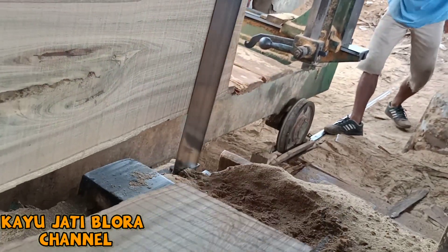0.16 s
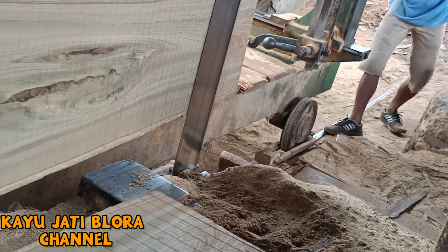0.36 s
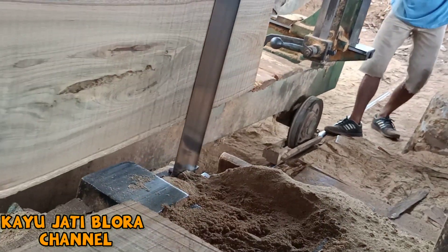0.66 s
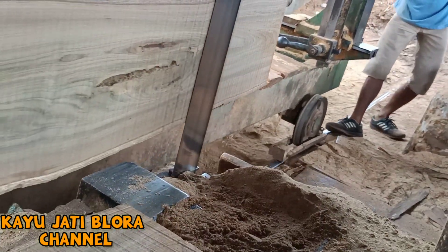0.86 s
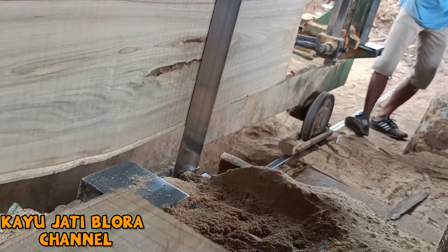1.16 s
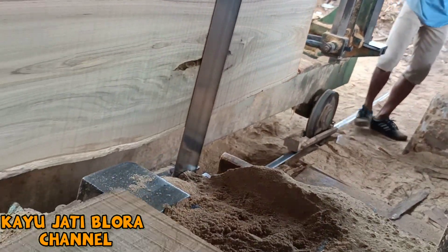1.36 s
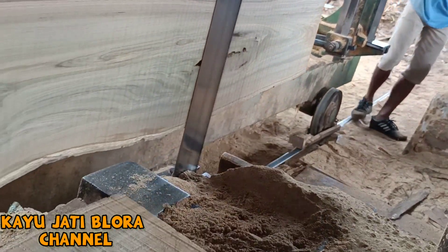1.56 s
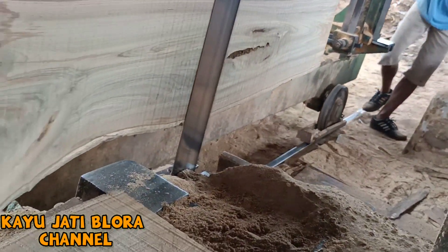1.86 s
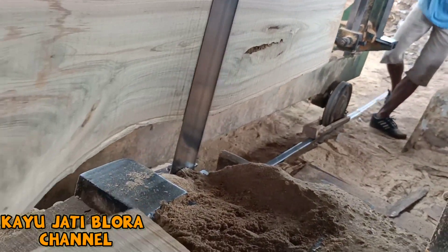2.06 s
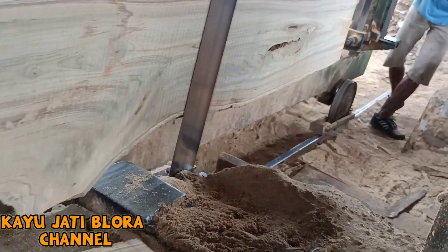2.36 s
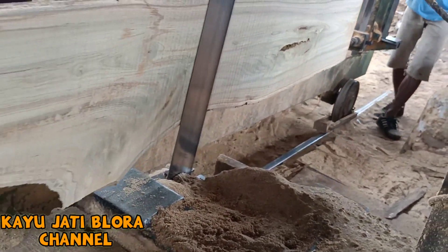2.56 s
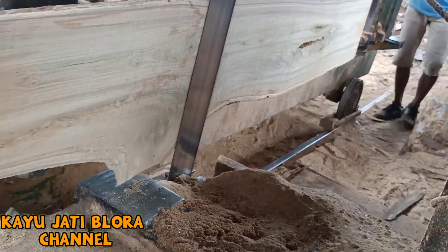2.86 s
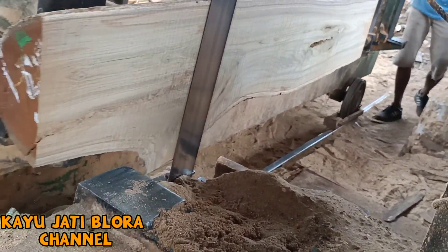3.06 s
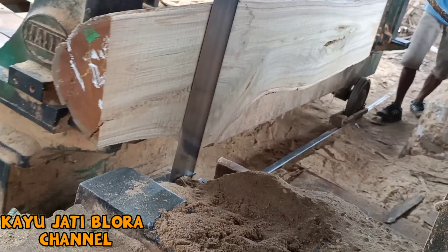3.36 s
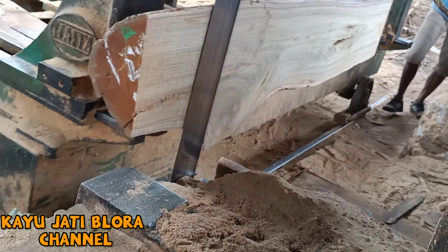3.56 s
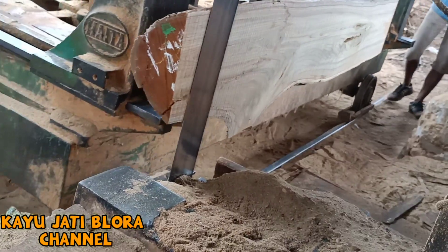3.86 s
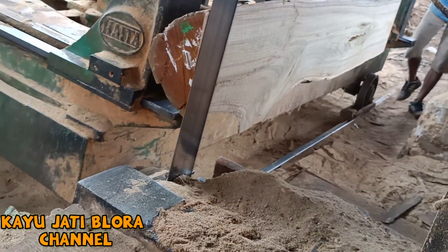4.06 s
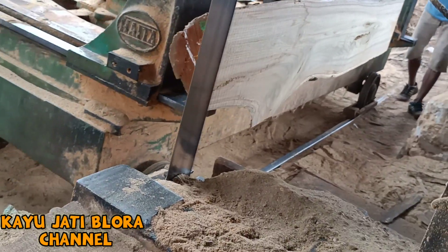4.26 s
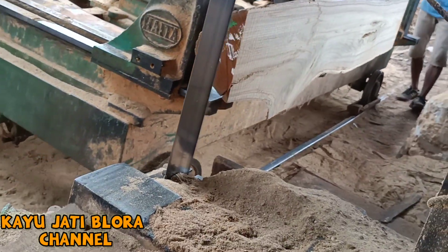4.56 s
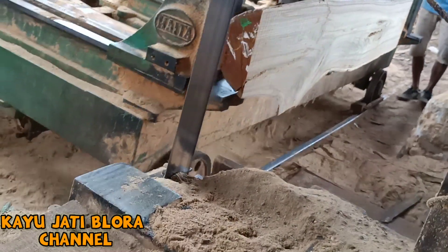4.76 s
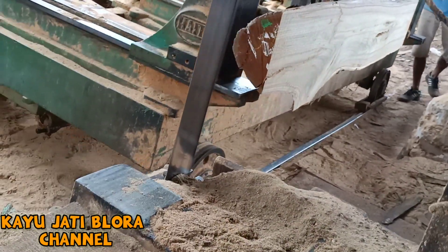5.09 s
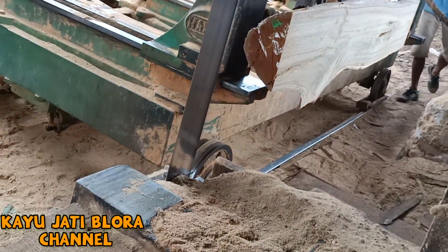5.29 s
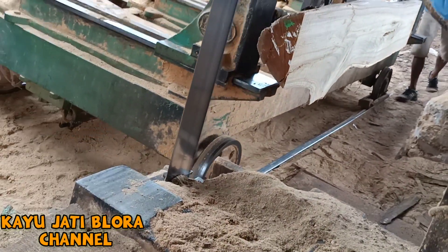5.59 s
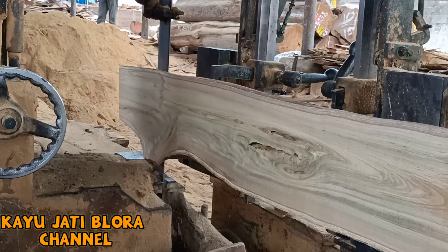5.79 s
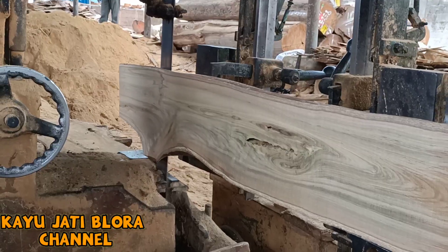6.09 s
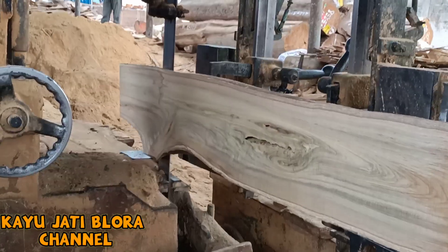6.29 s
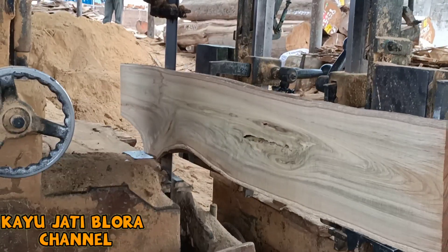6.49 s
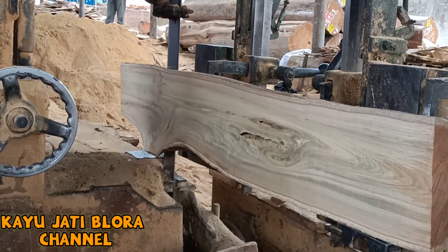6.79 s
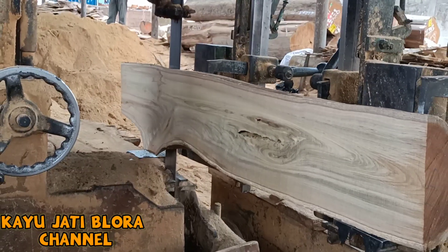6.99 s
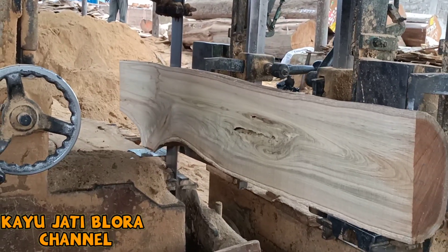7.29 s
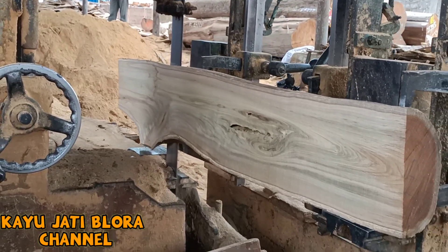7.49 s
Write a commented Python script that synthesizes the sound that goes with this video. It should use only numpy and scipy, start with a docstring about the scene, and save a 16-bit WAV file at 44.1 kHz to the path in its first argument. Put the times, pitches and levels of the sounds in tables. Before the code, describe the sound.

A band saw rips through a thick log with a loud bright rasping hiss and whistle, then the view shifts and wind buffets one side.

```python
"""A band saw rips a log lengthwise, heard close up through two small microphone ports.
From the start teeth rasp and whistle in the kerf, chips hiss, narrow rings swell, and frame and iron drone.
Wood soon pinches the blade in bursts of rubbing; low knocks and faint bursts of low noise come and go.
The whistle rises from about 4.65 s; at 5.64 s the listening place moves to the other side of the saw,
where a motor whines and a draught buffets the right port. Shaped noise, tooth pulses and sines make it all."""
import sys
import numpy as np
from scipy import signal
from scipy.fft import rfft, irfft, next_fast_len
from scipy.io import wavfile
from scipy.ndimage import uniform_filter1d, map_coordinates

SR = 44100
rng = np.random.default_rng(int(sys.argv[2]) if len(sys.argv) > 2 else 0)


def to_wav(s):
    """Save 16-bit WAV."""
    ch = np.atleast_2d(s).T  # columns
    pcm = np.round(np.clip(ch, -1, 1) * 32767)  # PCM
    wavfile.write(sys.argv[1], SR, pcm.astype(np.int16))


N = 336924
T = np.arange(N) / SR  # time in s
MOVE_S = 5.64  # when the listening place moves


def amp(db):
    """Level law: 20 dB is a factor of ten in amplitude."""
    return 10 ** (np.asarray(db) / 20)


def unit(x):
    """Normalisation to a root-mean-square of 1."""
    return x / np.sqrt(np.mean(x ** 2) + 1e-20)


def along(points, hz):
    """Interpolation of (f, value) points on a logarithmic frequency axis."""
    f, values = np.transpose(points)
    return np.interp(np.log(hz + 1), np.log(f + 1), values)


def curves(rows):
    """Linear interpolation in time: one curve for each column after the time."""
    times, *columns = np.transpose(rows)
    return [np.interp(T, times, column) for column in columns]


def wobble(rate):
    """Band-limited random modulation: a smooth curve through `rate` random knots a second, at rms 1."""
    knots = rng.standard_normal(16384)
    coarse = T[::8]
    smooth = map_coordinates(knots, [coarse * rate], mode="wrap")
    return unit(np.interp(T, coarse, smooth))


def filtered(x, response):
    """Linear filtering: the spectrum is multiplied by a response of frequency."""
    m = next_fast_len(N + 8192)
    hz = np.fft.rfftfreq(m, 1 / SR)
    return irfft(rfft(x, m) * response(hz), m)[..., :N]


def coloured(x, spectrum):
    """Spectral shaping: x is weighted by (f, dB) points and brought to rms 1."""
    return unit(filtered(x, lambda hz: amp(along(spectrum, hz))))


def white():
    """White noise: equal power at all frequencies, uncorrelated between the ports."""
    return rng.standard_normal((2, N))


def patchy(x, depth_db, size):
    """Random spectro-temporal modulation: gains drift in patches of size (bins, frames)."""
    z = signal.stft(x, nperseg=2048)[2]
    field = rng.standard_normal(z.shape)
    for axis in (1, 2, 1, 2):
        field = uniform_filter1d(field, size[axis - 1], axis)
    return signal.istft(z * amp(depth_db * unit(field)), nperseg=2048)[1][:, :N]


def swells(rows):
    """Gaussian envelopes: each (centre, reach, dB) bell falls by e squared at its reach."""
    total = 0
    for centre, reach, db in rows:
        total = total + amp(db) * np.exp(-2 * np.minimum(((T - centre) / reach) ** 2, 20))
    return total


def held(start, length, attack_s, release_s, sag_db_per_s):
    """Attack, exponential decay and release: an envelope rises, sags while it holds, and lets go."""
    age = T - start
    attack = np.clip(age / attack_s, 0, 1)
    release = np.clip((length - age) / release_s + .5, 0, 1)
    return attack * release * amp(-sag_db_per_s * np.clip(age, 0, None))


def behind():
    """Crossfade of listening place: 0 at the first, 1 at the second, within 10 ms."""
    return np.clip((T - MOVE_S) * 100 + .5, 0, 1)


# Coherence of the sound field at the two ports: f/Hz, left-right likeness [0 to 1]
PORT_LIKENESS = [(40, 0.51), (130, 0.98), (640, 0.75), (1000, 0.71), (1500, 0), (3000, 0.14)]


def port_angle(hz):
    """Correlation as an angle: half the arccosine of the left-right likeness."""
    return np.arccos(np.clip(along(PORT_LIKENESS, hz), -1, 1)) / 2


def spread(pair):
    """Spatial coherence: long waves reach both ports alike, short ones do not."""
    split = lambda hz: np.array([np.cos(port_angle(hz)), np.sin(port_angle(hz))])
    mid, side = filtered(pair, split)
    return np.array([mid + side, mid - side])


def from_right(x, lag_s):
    """Interaural-type delay: sound from the right reaches the left port a little later."""
    return filtered(x, lambda hz: np.exp(1j * np.pi * hz * lag_s * np.array([[-1], [1]])))


def tones(rows, steady):
    """Narrow-band lines: a steady phasor plus one that fades and wavers, from (f, width, dB) rows."""
    out = np.zeros((2, N))
    for hz, width, db in rows:
        wavering = wobble(1.5 * width) + 1j * wobble(1.5 * width)
        swell = np.sqrt(steady) + np.sqrt((1 - steady) / 2) * wavering
        apart = port_angle(hz)
        port_phases = np.exp([[1j * apart], [-1j * apart]])
        line = swell * np.exp(2j * np.pi * hz * T)
        out += amp(db) * np.sqrt(2) * np.real(port_phases * line)
    return out


# How hard the log is fed into the teeth: t/s, load/dB
FEED_LOAD = [(0, 1), (1.5, 1.3), (2.1, -1.5), (2.7, -0.5), (3, -2), (3.48, -2), (3.6, .5), (4.45, 1.45),
             (4.9, 0.1), (5.3, 0.4), (7.64, -1)]


def load():
    """Feed force as a driving level, in dB."""
    return curves(FEED_LOAD)[0]


def level(first_db, second_db, per_load):
    """Source level in dB: set by the listening place, raised in proportion to the load."""
    return first_db + (second_db - first_db) * behind() + per_load * load()


# Tooth strikes on steel, spectral shape: f/Hz, relative level/dB
STRIKE_SPECTRUM = [(2000, 0.5), (9000, -4), (9950, 3), (10400, 5), (10850, 3.5), (11400, 8), (13000, -4),
                   (14500, -8), (16000, -1)]


def teeth(flutter):
    """Periodic excitation: one pulse per tooth; speed flutters and scattered paths smear each pulse."""
    tooth_hz = 452.2
    speed = 1 + flutter * wobble(70) + .0012 * wobble(3)
    turns = np.cumsum(tooth_hz * speed) / SR
    offset = (turns % 1 - .5) * SR / tooth_hz  # samples from the nearest strike
    paths = rng.standard_normal((2, 40))  # one random phase per port and tooth harmonic

    def scatter(hz):
        """Dispersion: each harmonic takes its own phase."""
        harmonic = np.minimum(np.rint(hz / tooth_hz).astype(int), paths.shape[1] - 1)
        return np.exp(2j * np.pi * paths[:, harmonic])

    return coloured(unit(filtered(np.sinc(offset), scatter)), STRIKE_SPECTRUM)


def bite(pulses, share):
    """Power-preserving mixture: regular tooth strikes with the noise of tearing fibres."""
    return np.sqrt(share) * pulses + np.sqrt(1 - share) * white()


def modes(rows):
    """Modal resonance: narrow (f, width, dB) bands kept ringing by noise as random blows."""
    def bells(hz):
        """Superposed modal power, as an amplitude response."""
        power = sum(amp(2 * db) / width * np.exp(-((hz - centre) / width * 2) ** 2)
                    for centre, width, db in rows)
        return np.sqrt(power)

    total = np.sqrt(sum(amp(2 * db) for _, _, db in rows))
    return total * unit(filtered(white(), bells))


# Rasp of the teeth in the wood: level/dB at first place, level/dB at second, dB per dB of load
RASP_LEVELS = (-22.6, -25.5, 0.98)
# Rasp spectral density: f/Hz, relative level/dB per Hz
RASP_SPECTRUM = [(1000, -34), (1600, -27.5), (2050, -3), (2500, 1), (3300, 1.5), (3780, -2.5), (4300, 1),
                 (5500, -4), (7500, -8.5), (9500, -10.5), (16000, -47)]
# Bending modes of the blade: f/Hz, width/Hz, level/dB relative to the rasp at the first place
BENDING_MODES = [(2315, 34, -22), (2890, 40, -22), (2948, 60, -16), (3168, 28, -15), (3284, 130, -16.5)]


def rasp(pulses, grain):
    """Forced vibration: tearing fibres excite a broad band and the blade's bending modes."""
    tearing = patchy(bite(pulses, share=.02), depth_db=2.3, size=(4, 6))
    # the modes all but vanish at the second place
    ringing = amp(-42 * behind()) * patchy(modes(BENDING_MODES), depth_db=2, size=(3, 8))
    rasp_db = level(*RASP_LEVELS) + 0.36 * grain + 0.79 * wobble(40)
    return amp(rasp_db) * (coloured(tearing, RASP_SPECTRUM) + ringing)


# Kerf whistle before damping: level/dB at first place, level/dB at second, dB per dB of load
WHISTLE_LEVELS = (-24.5, -25.5, 0.52)
# It rises as the blade nears the end of the log: t/s, f/Hz, emphasis/dB
KERF_PATH = [(0, 5158, 1), (4.65, 5215, -1.6), (5.08, 6800, 1.5), (5.55, 6780, 1.8), (5.75, 6680, -2),
             (7, 6540, 3), (7.64, 6540, -1.5)]


def kerf_whistle(grain, pinch):
    """Moving resonance: low-pass noise modulates a gliding carrier; rubbing damps it."""
    centre_hz, emphasis_db = curves(KERF_PATH)
    width_hz = 930
    phase = 2 * np.pi * np.cumsum(centre_hz) / SR
    slow = lambda: filtered(white(), lambda hz: 1 / (1 + (hz / width_hz) ** 2))
    band = unit(slow() * np.cos(phase) + slow() * np.sin(phase))
    whistle_db = level(*WHISTLE_LEVELS) + emphasis_db + 0.15 * grain + 0.6 * wobble(30)
    pinch_damping = 1.4  # how strongly the rubbing smothers the whistle
    return amp(whistle_db) * patchy(band, depth_db=2.5, size=(4, 4)) / (1 + pinch_damping * pinch)


# Hiss of the chips: level/dB at first place, level/dB at second, dB per dB of load
CHIP_LEVELS = (-26, -25.5, .3)
# Chip spectral density: f/Hz, relative level/dB per Hz
CHIP_SPECTRUM = [(5000, -16), (7500, -4.5), (8500, 2.5), (10500, 4), (12000, -1), (13300, 0.5),
                 (16000, -31)]


def chips(pulses, regular, modulation_db):
    """Granular noise: chips hiss out of the kerf in uneven spurts."""
    spray = patchy(bite(pulses, regular), depth_db=2.0, size=(5, 3))
    return amp(level(*CHIP_LEVELS) + modulation_db) * coloured(spray, CHIP_SPECTRUM)


# Rubbing between pinches: level/dB at first place, level/dB at second, dB per dB of load
RUB_LEVELS = (-34, -22, 0.1)
# Rub spectral density: f/Hz, relative level/dB per Hz
RUB_SPECTRUM = [(7000, -57), (10500, -4), (12500, -2), (13500, -4), (14500, 7), (16000, -5)]


def rub(pulses, regular, pinch, modulation_db):
    """Sliding friction: the wood's pressure on the blade's side sets the level of a pulsing fizz."""
    pressure = np.hypot(amp(level(*RUB_LEVELS)), pinch)
    sliding = patchy(bite(pulses, 0.92 * regular), depth_db=3.5, size=(5, 3))
    return pressure * amp(modulation_db) * coloured(sliding, RUB_SPECTRUM)


# Narrow, unsteady rings that swell and fade, 2 to 3.6 kHz: centre t/s, reach/s, f/Hz, level/dB
UNSTEADY_RINGS = [(.02, 0.23, 3420, -28), (.3, 1, 2087, -32), (.37, 0.22, 3166, -26),
                  (.83, .22, 3170, -27.5), (1.25, .4, 2254, -35), (1.55, .28, 3060, -32),
                  (3.948, .4, 2245, -32.5), (5.298, .4, 3630, -30.5)]


def unsteady_rings():
    """Narrow-band noise: wavering lines swell and fade under Gaussian envelopes."""
    total = np.zeros((2, N))
    for s, reach, hz, db in UNSTEADY_RINGS:
        total += swells([(s, reach, db)]) * tones([(hz, 170, 0)], steady=0)
    return total


# The kerf closes and pinches the blade: start t/s, length/s, rub level/dB, extra chips/dB, extra chatter/dB
KERF_PINCHES = [(0.697, 0.18, -29, 2, -2), (1.63, 0.74, -25.5, 2.5, 1.8), (2.687, 0.074, -20, 5, 0),
                (2.812, 0.63, -26.5, 4, 0.5), (4.353, 0.16, -40, 3, -1), (5.04, 0.65, -28, 1.5, -2),
                (7.27, 0.27, -23, -3, 0)]


def pinching():
    """Normal force in friction: each grip adds rub amplitude, dB of chips and dB of chatter."""
    grips = np.array([held(s, length, attack_s=0.017, release_s=0.057, sag_db_per_s=4)
                      for s, length, *_ in KERF_PINCHES])
    _, _, rub_db, chips_db, chatter_db = np.transpose(KERF_PINCHES)
    return np.array([amp(rub_db), chips_db, chatter_db]) @ grips


def blade():
    """Common excitation: the same teeth, grain and pinches drive the blade's rasp, whistle, chips and rub."""
    pinch, extra_chips_db, pinch_chatter_db = pinching()
    pulses = teeth(flutter=.0026)
    regular = .02 + .08 * behind()  # share of regular tooth strikes
    grain = wobble(26)  # hard and soft streaks in the wood
    spurts_db = 0.67 * wobble(70) + 0.12 * wobble(7)  # dust leaves the kerf unevenly
    sway = np.sin(2 * np.pi * np.cumsum(15.0 + 1.06 * wobble(6.2)) / SR)  # about 15 Hz
    chatter = (.4 + pinch_chatter_db) * sway
    chip_modulation_db = extra_chips_db + .5 * grain + spurts_db + .25 * chatter
    rub_modulation_db = 0.44 * grain + 0.84 * spurts_db + chatter
    cutting = rasp(pulses, grain) + kerf_whistle(grain, pinch)
    spray = chips(pulses, regular, chip_modulation_db)
    rubbing = rub(pulses, regular, pinch, rub_modulation_db)
    return cutting + spray + rubbing + unsteady_rings()


# Rumble before throbbing: level/dB at first place, level/dB at second, dB per dB of load
RUMBLE_LEVELS = (-38.5, -41.5, .9)
# Rumble spectral density: f/Hz, relative level/dB per Hz
RUMBLE_SPECTRUM = [(20, -20), (60, -13.5), (130, -11), (215, -1), (275, -9.5), (350, 0), (450, 2),
                   (620, -1), (690, -8), (1000, -14), (3000, -62)]


def rumble():
    """Amplitude modulation: the turning wheels make low noise throb."""
    wheel = np.sin(2 * np.pi * np.cumsum(10.55 + .1 * wobble(2)) / SR)  # about 10.55 Hz
    return amp(level(*RUMBLE_LEVELS) + 2.4 * wheel) * coloured(white(), RUMBLE_SPECTRUM)


# Noise of the frame: level/dB at first place, level/dB at second, dB per dB of load
FRAME_LEVELS = (-33.5, -39.5, 1.4)
# Frame spectral density: f/Hz, relative level/dB per Hz
FRAME_SPECTRUM = [(400, -45), (690, -6.5), (760, 1.5), (1100, -0.5), (1350, -2), (1750, -1.5),
                  (2300, -10.5), (5000, -43)]


def frame_noise():
    """Structure-borne sound: patchy noise of the frame grows with load."""
    noise = patchy(white(), depth_db=2.0, size=(2, 12))
    return amp(level(*FRAME_LEVELS) + 0.82 * wobble(14)) * coloured(noise, FRAME_SPECTRUM)


# Frame rings at the first place: f/Hz, width/Hz, level/dB at 0 dB load
FRAME_RINGS = [(1155, 14, -41.5), (1210, 9.4, -49.5), (1531, 14, -47)]
# Two drones near the tooth rate: f/Hz, width/Hz, level/dB at 0 dB load
BEATING_DRONES = [(456, 4, -45.5), (466, 4, -45.5)]
# Steady whine of the drive at the first place: f/Hz, width/Hz, level/dB
DRIVE_WHINE = [(104.5, 2, -59.5), (588, 2, -47)]
# Drones at the second place: f/Hz, width/Hz, level/dB
DRONES_BEHIND = [(454, 4, -47), (870, 16, -53), (1275, 7.5, -62), (1560, 8, -64), (1843, 4.6, -53.5)]


def drone():
    """Resonance and beats: frame lines grow with load, and two close drones interfere."""
    rings = amp(load()) * tones(FRAME_RINGS, steady=0.2)
    beating = amp(2 * load()) * tones(BEATING_DRONES, steady=0.35)  # 2 dB per dB of load
    front = rings + beating + tones(DRIVE_WHINE, steady=0.69)
    return (1 - behind()) * front + behind() * tones(DRONES_BEHIND, steady=0.75)


# Swells of the drive's hum: centre t/s, reach/s, level/dB
DRIVE_HUM_SWELLS = [(.5, .8, -46), (1.35, 0.39, -37.5), (3, 0.38, -41), (3.62, 0.47, -39.5), (4.8, .9, -45)]


def drive_hum():
    """Narrow-band modulation: an 807 Hz hum swells above its floor of -56 dB."""
    return (amp(-56) + swells(DRIVE_HUM_SWELLS)) * tones([(807, 14, 0)], steady=0.55)


def machine():
    """Superposition: the broad noise is spread between the ports and the lines are added."""
    return spread(rumble() + frame_noise()) + drone() + drive_hum()


# Swells of low rolling noise: centre t/s, reach/s, level/dB before roughness
ROLLING_SWELLS = [(1.25, .45, -46), (2.15, 0.28, -55), (2.8, 0.42, -51), (3.9, 0.57, -50),
                  (5.1, 0.9, -46.5)]
# Rolling spectral density: f/Hz, relative level/dB per Hz
ROLLING_SPECTRUM = [(20, -6), (50, -10), (110, -3), (170, -3.5), (280, -10), (700, -40)]
# Short low knocks and longer low noise swells: centre t/s, reach/s, level/dB
LOW_KNOCKS = [(1.173, 0.0029, -19), (1.197, 0.022, -31), (1.4, 0.22, -41), (2.78, 0.24, -40.5),
              (4.43, 0.11, -31.5)]
# Knock spectral density: f/Hz, relative level/dB per Hz
KNOCK_SPECTRUM = [(30, -17), (130, -3), (400, 4), (600, 4.5), (1200, -26), (4000, -55)]
# Rings of the iron carriage: f/Hz, width/Hz, level/dB once near
IRON_RINGS = [(161, 5, -49.5), (355, 3, -46.5), (523.6, 2.6, -46), (757, 12, -45), (904, 10, -45),
              (947, 8.7, -45.5), (1017, 6, -41), (1033, 5, -47.5)]


def carriage():
    """Enveloped noise and resonance: low rolling and knocks; iron rings louder as its head draws near."""
    floor_db = -60  # rolling between swells
    rolling = (amp(floor_db) + swells(ROLLING_SWELLS)) * amp(1.4 * wobble(22))
    rolling = rolling * coloured(white(), ROLLING_SPECTRUM)
    knocks = swells(LOW_KNOCKS) * coloured(white(), KNOCK_SPECTRUM)
    near_s, approach_s, far_db = 3.62, .5, -8.5  # middle and length of the approach, gain before it
    far = np.clip((near_s - T) / approach_s + .5, 0, 1)
    iron = (1 - behind()) * amp(far_db * far) * tones(IRON_RINGS, steady=0.23)
    return spread(rolling + knocks) + iron


# Bursts of low noise on the right, two faint early, then strong gusts:
# start t/s, length/s, low push level/dB, bright flapping level/dB (at onset)
AIR_BURSTS = [(1.05, .6, -48, -65), (2.25, .12, -43, -60), (5.76, .1, -40, -48), (5.867, 0.097, -32, -40),
              (5.998, 0.12, -36, -42), (6.2, .15, -37, -42), (6.39, 0.17, -35, -38),
              (6.595, 0.15, -32, -48), (6.73, 0.18, -25.5, -36), (7.006, .13, -20.5, -31),
              (7.17, 0.1, -23, -29), (7.259, 0.4, -24.5, -22.5)]
# Single puffs on the right port: centre t/s, reach/s, level/dB
AIR_PUFFS = [(2.125, 0.021, -27), (5.905, .006, -32), (6.012, .007, -29), (6.342, .012, -28),
             (5.773, .009, -26), (2.975, 0.019, -26.5), (5.93, 0.0092, -25), (6.063, 0.0085, -20),
             (6.095, .01, -18.5), (6.405, 0.01, -20), (6.438, .0052, -17), (6.535, .0094, -24)]
# Spectral density of the low push: f/Hz, relative level/dB per Hz
PUSH_SPECTRUM = [(20, -0.5), (80, 0.5), (160, -2), (300, -12), (600, -14.5), (1500, -33), (5000, -67)]
# Spectral density of the bright flapping: f/Hz, relative level/dB per Hz
FLAP_SPECTRUM = [(60, -16), (180, 0), (350, 0), (550, -3), (900, -11.5), (1600, -20), (5000, -52)]


def draught():
    """Turbulent pressure: bursts of low noise buffet the right port and hardly touch the left."""
    bursts = np.array([held(s, length, attack_s=0.016, release_s=0.018, sag_db_per_s=14)
                       for s, length, *_ in AIR_BURSTS])
    _, _, push_db, flap_db = np.transpose(AIR_BURSTS)
    puffs = swells(AIR_PUFFS)
    breeze = behind() * amp(-40.5)  # the air between bursts, at the second place
    push = (breeze + amp(push_db) @ bursts) * amp(2.6 * wobble(60)) + puffs
    flap = (amp(flap_db) @ bursts) * amp(2.2 * wobble(70)) + amp(-9) * puffs  # puffs have a bright edge
    air = push * coloured(white(), PUSH_SPECTRUM) + flap * coloured(white(), FLAP_SPECTRUM)
    return air * amp([[-24], [0]])  # left, right


def motor():
    """Phase integration: a clean whine at the second place slows a little in the cut and wavers in level."""
    whine_hz = 565 - 3.16 * (T - MOVE_S)  # falls 3.16 Hz each second
    whine = np.sqrt(2) * np.sin(2 * np.pi * np.cumsum(whine_hz) / SR)
    return behind() * amp(-46 + 0.95 * wobble(11)) * whine


def scene():
    """Superposition: blade, machine, carriage and motor sum; the draught acts on the ports themselves."""
    return blade() + from_right(machine() + carriage() + motor(), lag_s=.00006) + draught()


# Tone colour of the left channel, peak near 10 kHz and dip near 6.3 kHz: f/Hz, level/dB
LEFT_COLOUR = [(1100, -0.5), (1600, -1.5), (2500, 2), (4300, -2.5), (5300, -6.5), (6300, -16), (7050, -10),
               (7700, 0.5), (9000, 6), (9500, 11.5), (10700, 12), (11500, 5.5), (13700, 1), (15000, -22)]
# Tone colour of the right channel, dip near 9.7 kHz: f/Hz, level/dB
RIGHT_COLOUR = [(1100, -0.5), (2100, 5.5), (3800, 4.5), (5200, 6), (6500, 7), (8200, 2.5), (9000, -3.5),
                (9700, -22), (10500, -15), (11000, 1), (13200, 2), (14300, 3.5), (15500, 8)]


def record(dry):
    """Frequency response and band limiting: each channel has its tone colour; nothing passes above 15550 Hz."""
    colours = lambda hz: amp([along(LEFT_COLOUR, hz), along(RIGHT_COLOUR, hz)])
    return filtered(dry, lambda hz: colours(hz) * (hz < 15550))


dry = scene()
out = record(dry)
to_wav(out)
```